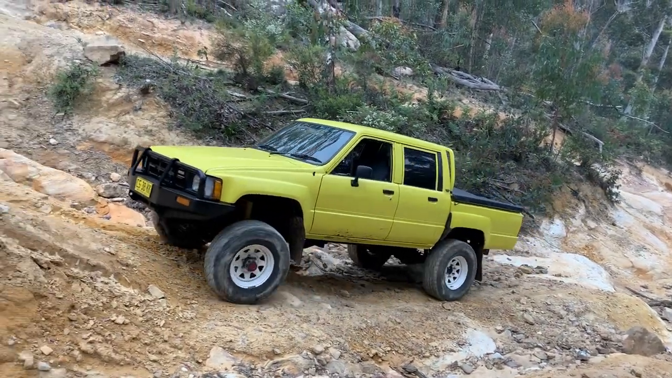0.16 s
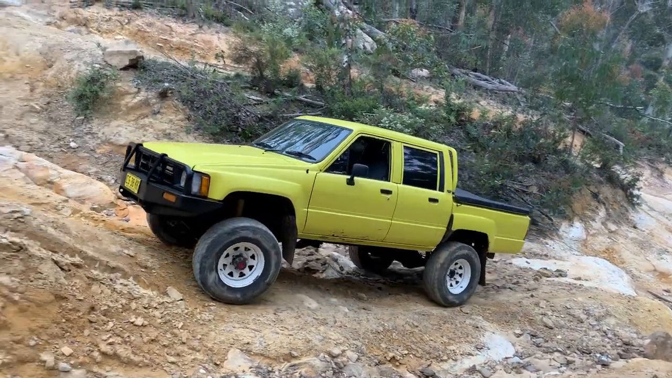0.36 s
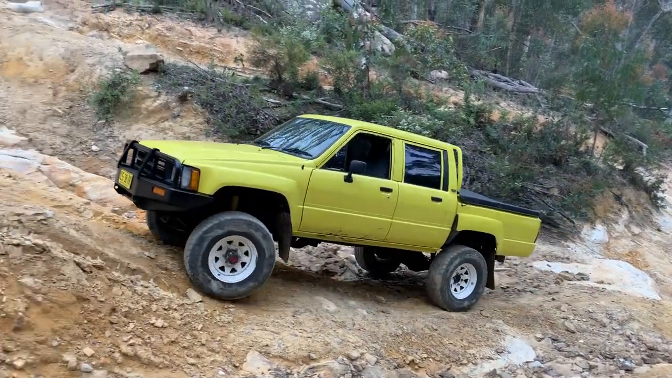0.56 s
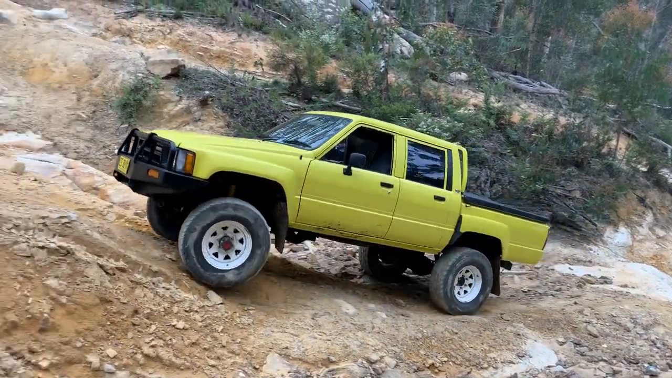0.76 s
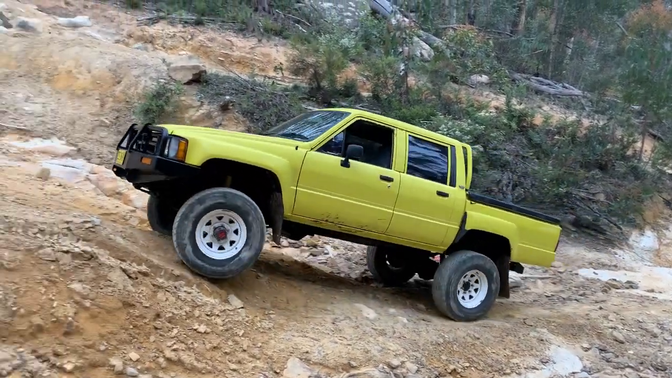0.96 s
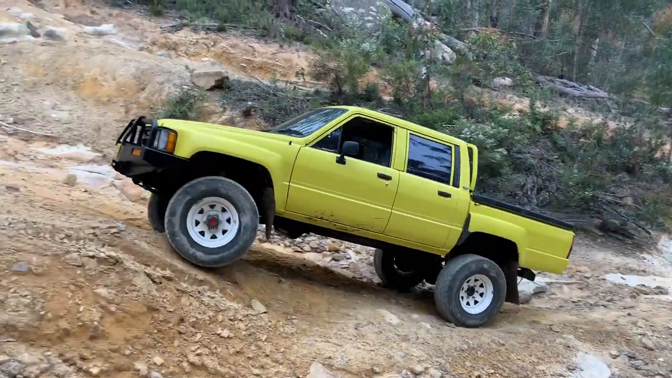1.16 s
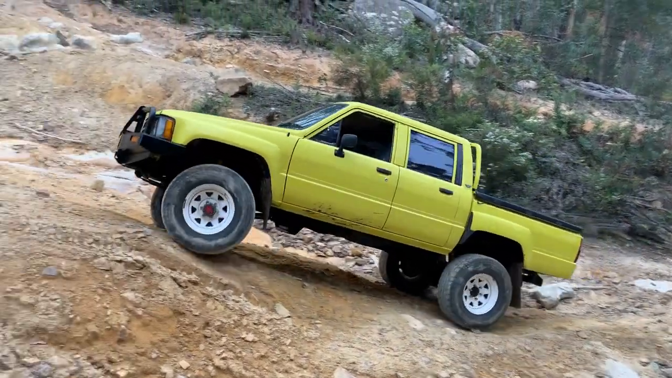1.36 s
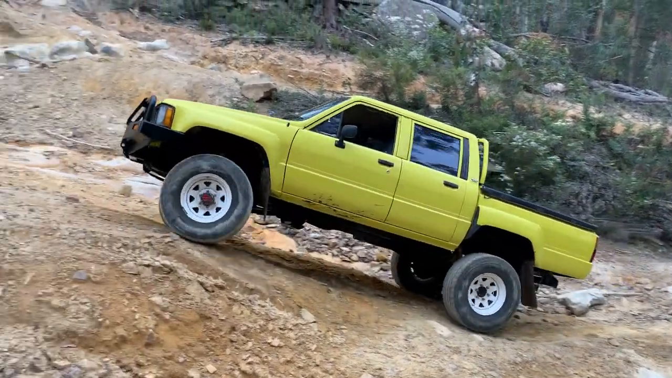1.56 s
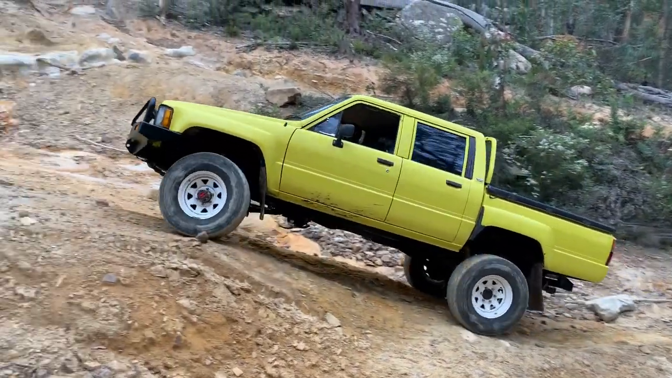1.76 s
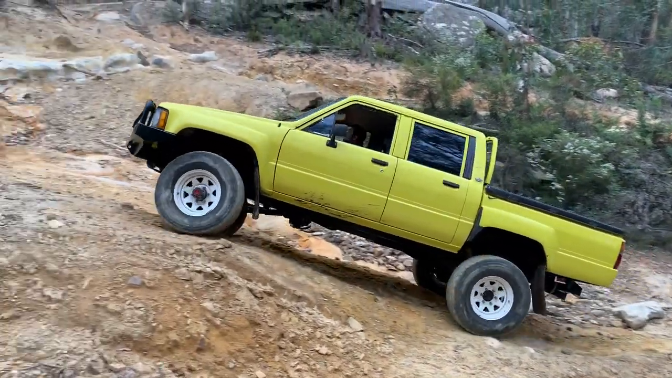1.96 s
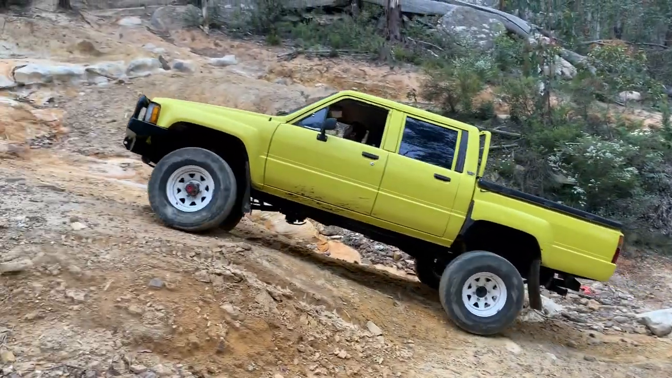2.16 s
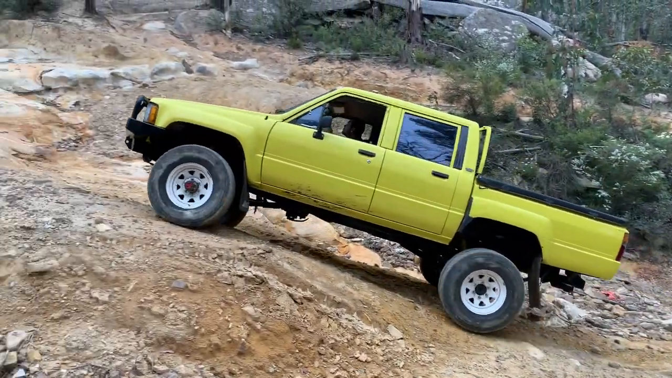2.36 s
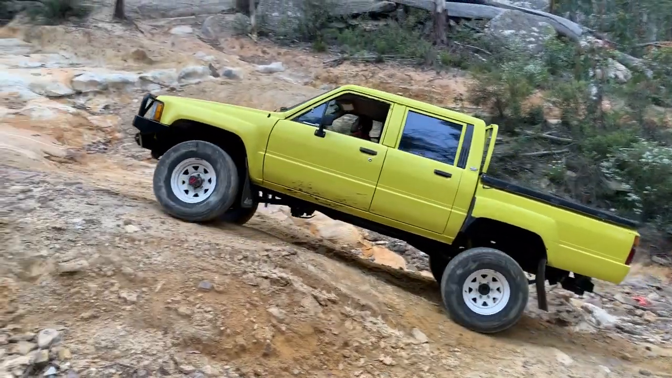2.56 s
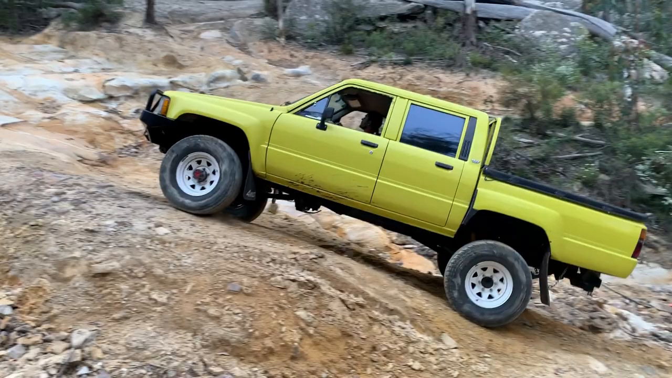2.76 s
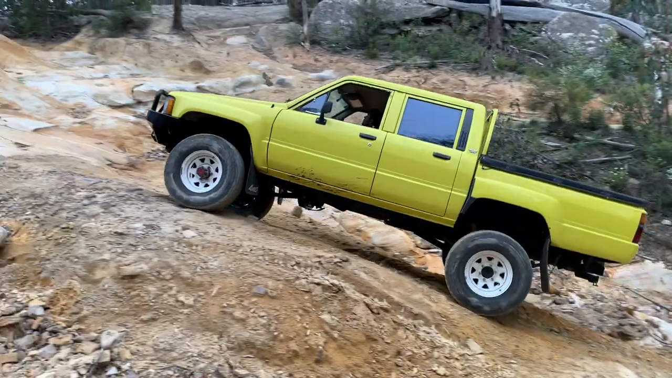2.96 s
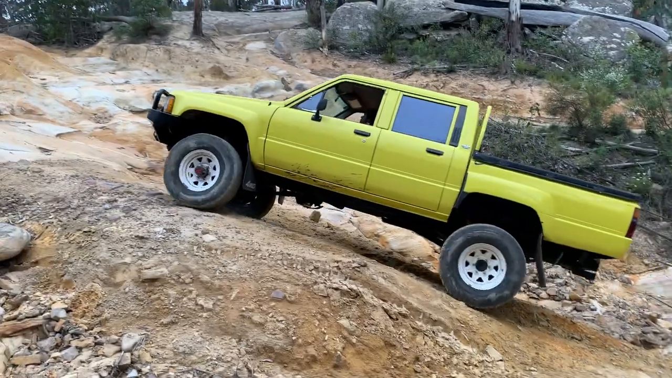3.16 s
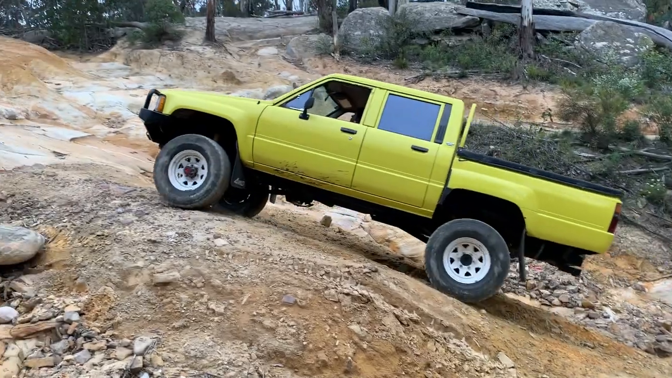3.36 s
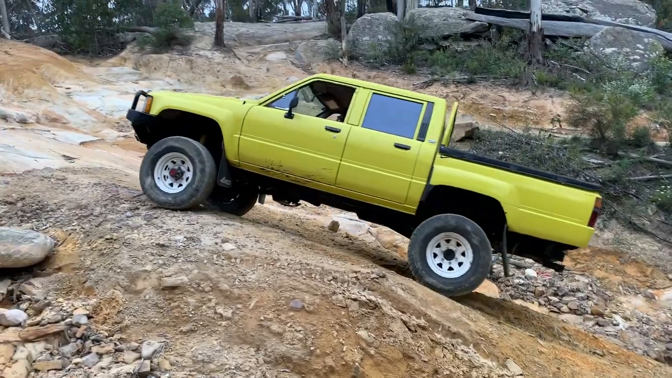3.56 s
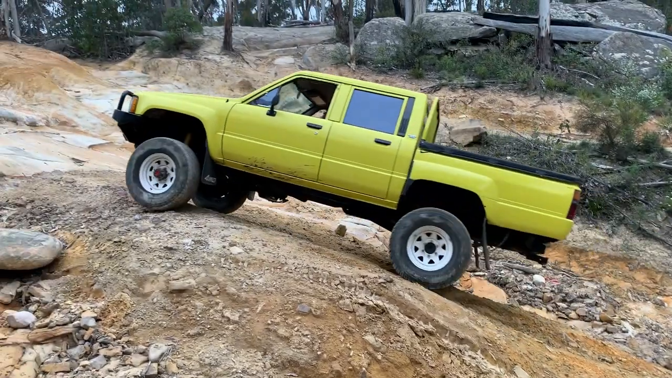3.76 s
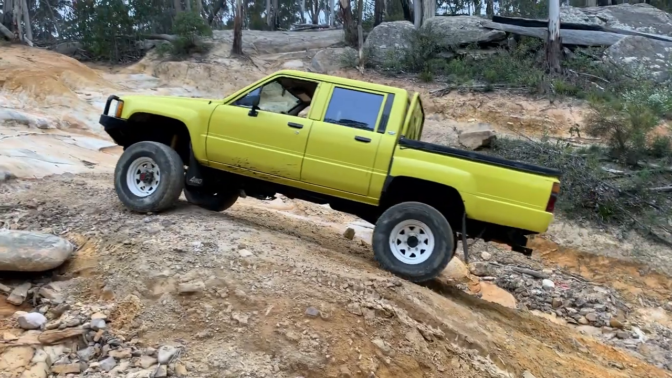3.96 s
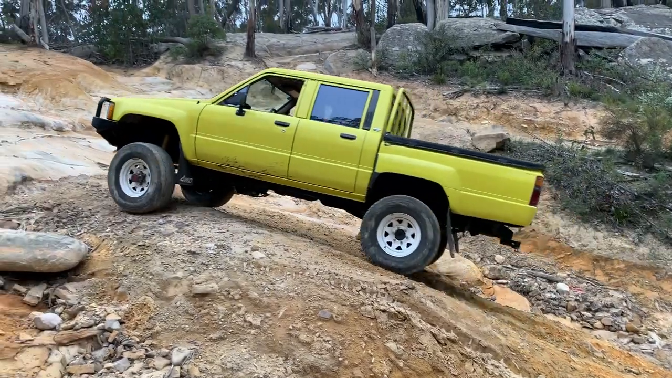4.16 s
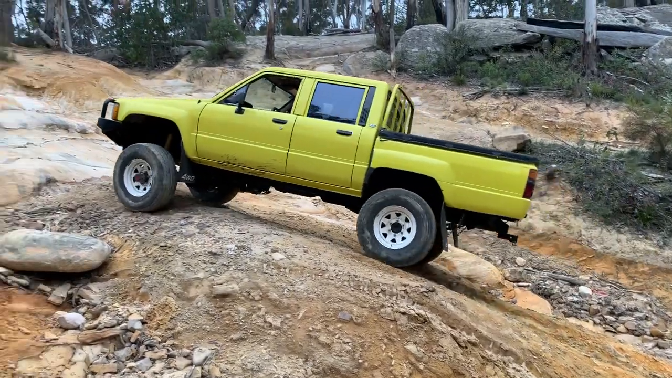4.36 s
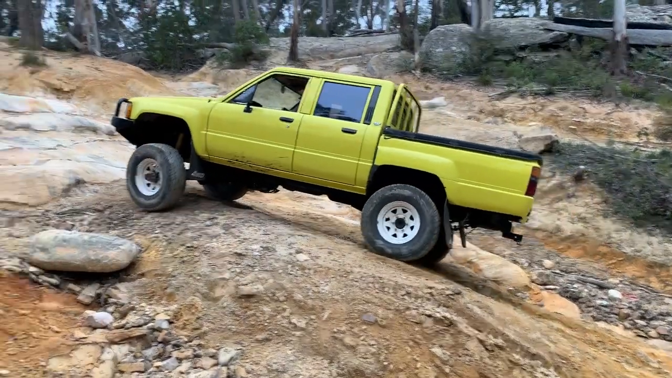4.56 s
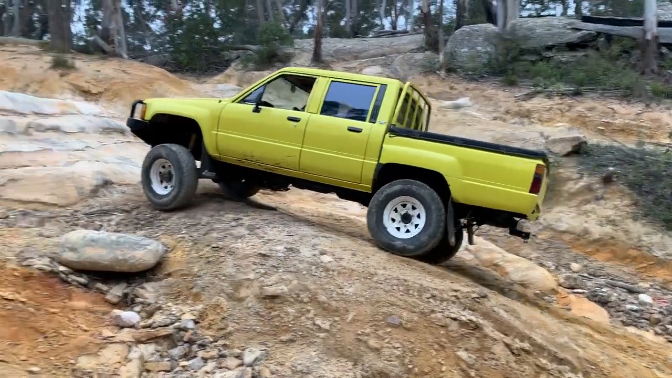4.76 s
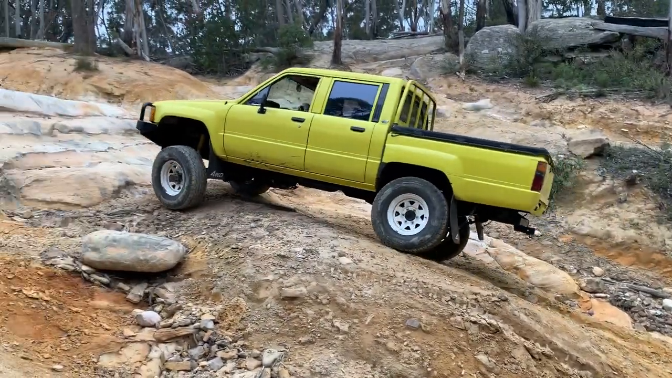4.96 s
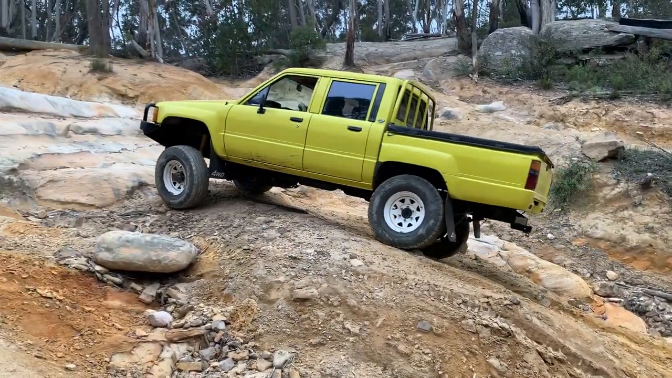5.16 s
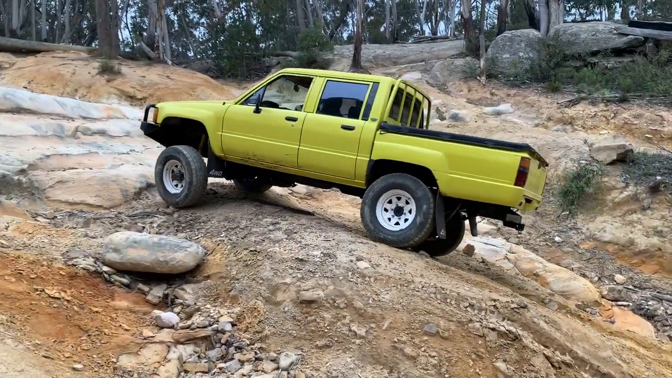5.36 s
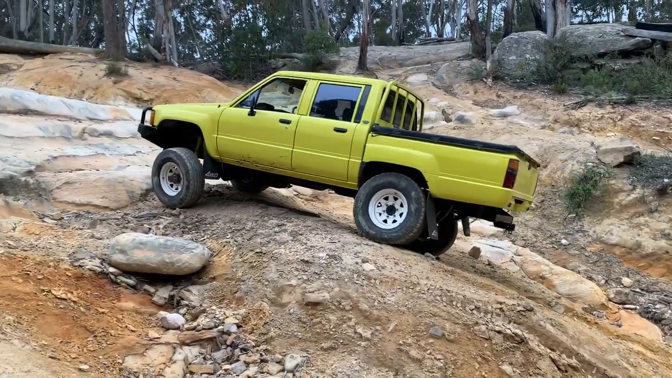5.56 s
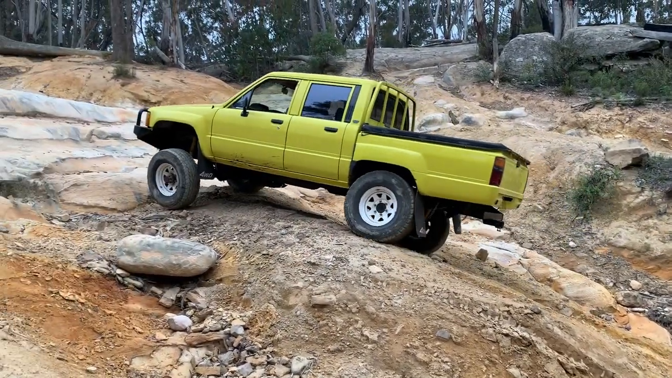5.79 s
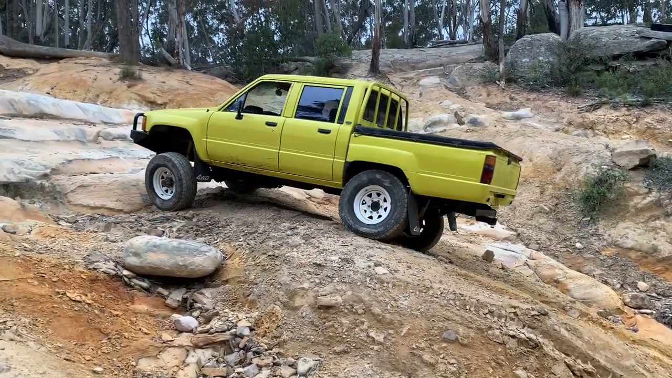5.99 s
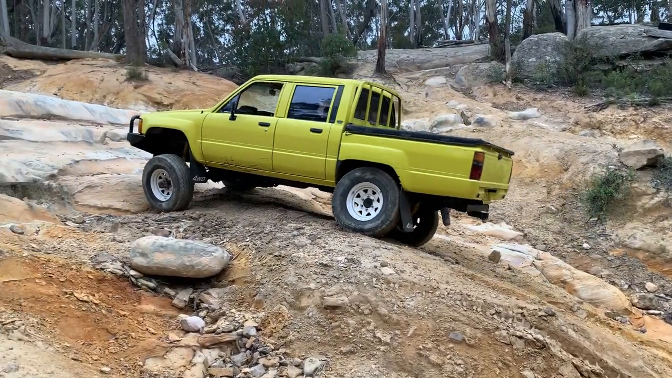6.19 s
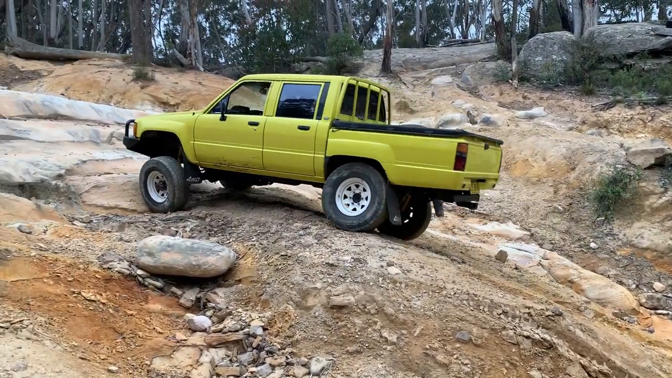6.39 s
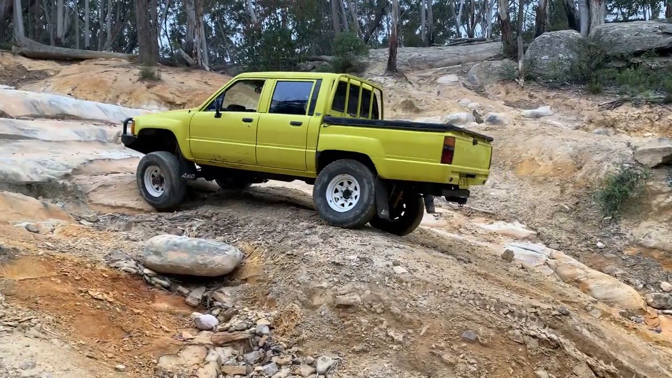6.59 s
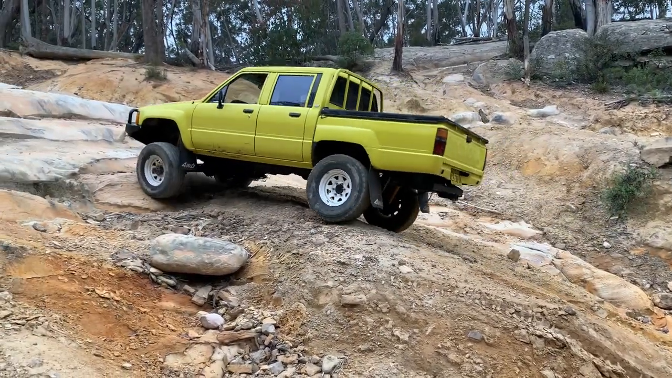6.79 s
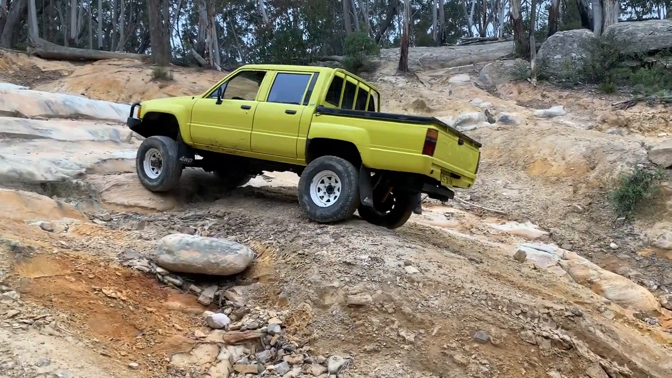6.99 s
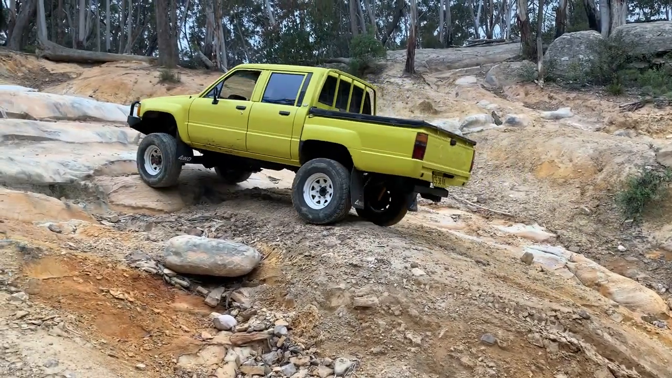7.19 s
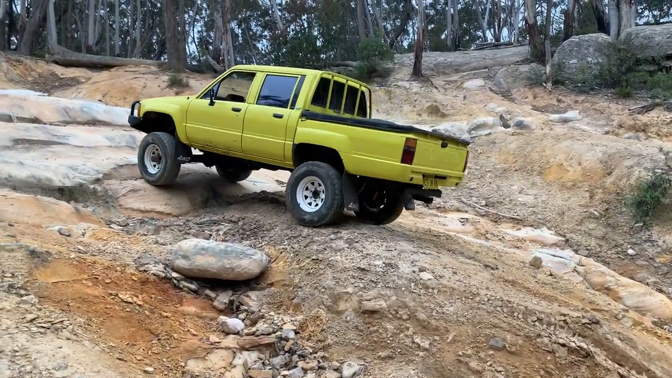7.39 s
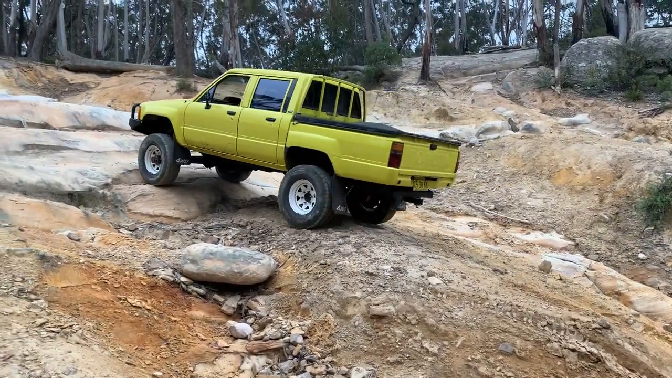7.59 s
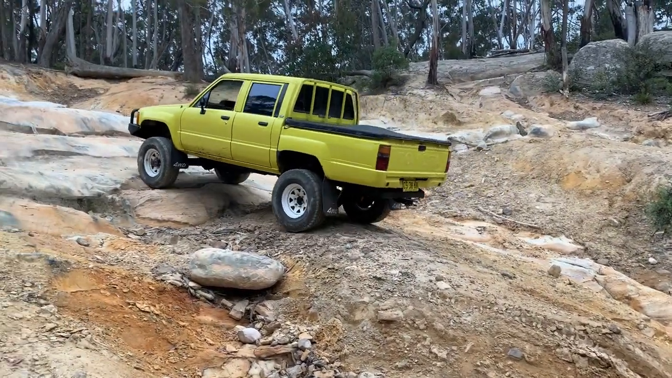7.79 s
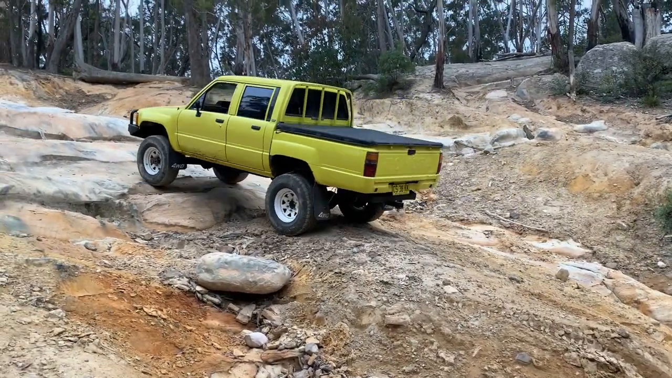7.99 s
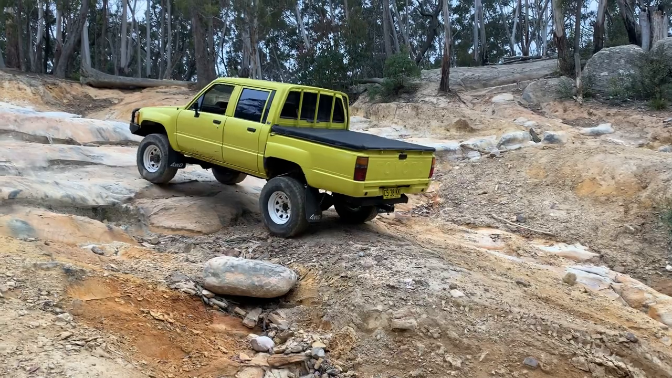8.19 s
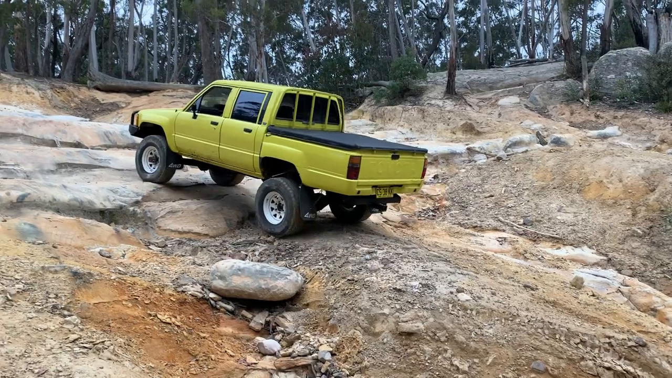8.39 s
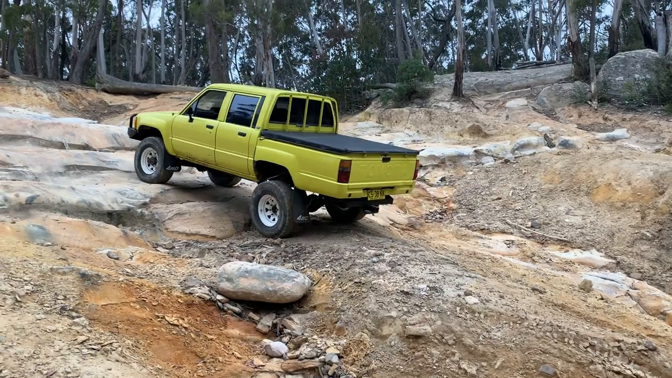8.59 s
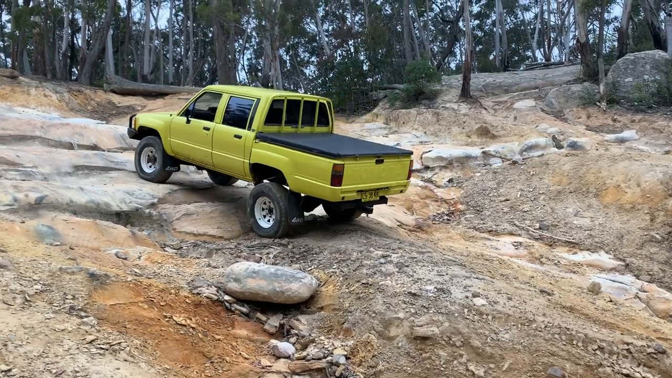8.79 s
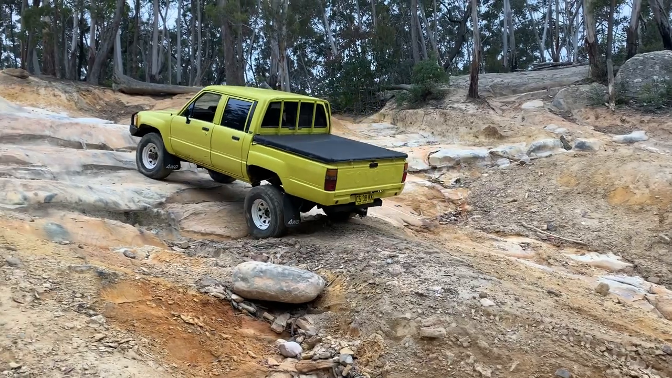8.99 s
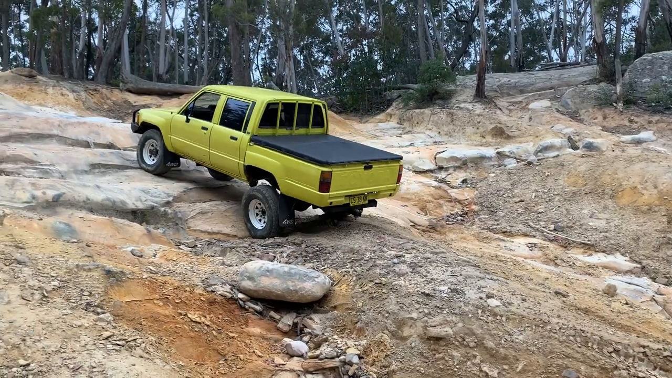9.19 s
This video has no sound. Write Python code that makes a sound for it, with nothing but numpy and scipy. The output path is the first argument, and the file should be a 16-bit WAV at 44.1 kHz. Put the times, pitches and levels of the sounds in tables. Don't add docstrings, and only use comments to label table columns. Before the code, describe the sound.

A close handheld stereo phone hears an old four-cylinder diesel climbing bare rock. First comes a fast, full exhaust roar with metallic knocking, short gritty tyre scrapes and stone cracks. The engine backs off over the crest into a hollow panel drone and slow separate thuds, bangs hard once, then picks up moderately, softer and turned away, with a thin high metal chirp and small knocks.

```python
import sys
import numpy as np
from scipy import signal
from scipy.fft import rfft, irfft
from scipy.io import wavfile
from scipy.ndimage import uniform_filter1d

SR = 44100
rng = np.random.default_rng(int(sys.argv[2]) if len(sys.argv) > 2 else 0)


def elevation(decibels):
    levels = np.asarray(decibels, float)
    return 10 ** (levels / 20)


def generate_wav(sig):
    pcm = np.round(np.clip(np.atleast_2d(sig).T, -1, 1) * 32767).astype(np.int16)
    wavfile.write(sys.argv[1], SR, pcm)


N = 407484
TIME, FREQ = np.arange(N) / SR, np.fft.rfftfreq(N, 1 / SR)

# (time [s], firing rate [Hz], exhaust level [dB], load [dB], engine bay nearness [dB])
DRIVE = [(.3, 47.88, 1.5, 0.4, 0.5), (1.3, 48.7, 4.5, 1, 1), (1.96, 55.44, 3.5, 5, 1),
         (2.24, 52.1, 4.5, 3.5, 1), (2.5, 56.93, 3, 5, 0.5), (2.85, 51.6, 4.5, 2, 0),
         (3.17, 54.56, 4, 3.5, 1), (3.65, 52.05, 3, 2, -3.5), (4.2, 44.4, 0, -4, -6.5),
         (4.74, 39.3, -5, -4, -6.5), (5.13, 28.54, -2.5, -2.3, -7), (6.1, 33.33, -4.5, -3, -0.5),
         (6.48, 30.65, -6, -2, -2.5), (6.92, 37.7, -4.5, -3, 0), (7.55, 36.05, -3.5, -2.5, 0),
         (7.97, 40.03, -6, -0.8, -1), (8.6, 36.41, -3.5, -3.5, -2.5), (9.0, 37.85, -3.5, -5, -4.5)]
TURN_FROM_S, TURN_TO_S = 3.7, 6.7
COAST_FROM_S, COAST_TO_S, COAST_EDGE_S = 3.86, 5.42, 0.35
# (own level [dB], share of exhaust level [dB/dB],
# share of nearness [dB/dB], change once turned away [dB], change coasting [dB])
LAYERS = [
    (-31.5, 0.61, .3, 0.5, -1.2),
    (-37.5, .01, .95, -1.5, 2.8),
    (-44, .01, 0.75, -1.5, 2.5),
    (-35.5, 0.61, 0.98, 5, -4.5),
    (-36.5, 0.28, .01, -8.5, 1),
]
CYLINDERS_DB = [0.5, -0.048, 0.39, -0.15]
# (own level [dB], answer to load [dB/dB])
ORDERS = [(-0.7, 0.72), (3, 2.2), (5, 0.59), (-2, -2.32)]
# (centre [Hz], width [Hz], level [dB])
SILENCER = [(50.5, 32.5, -20), (74.2, 12.3, -21), (92.7, 4.5, -32.5), (165.2, 9.7, -34),
            (187.3, 63.3, -31.5)]
# (centre [Hz], width [Hz], level [dB])
PIPE_MODES = [(184, 25.4, -4), (233, 21.8, 7.5), (305.6, 42, 0), (383, 20, -4.5), (415.5, 40, -1.5),
              (529, 19, -5.5)]
# (frequency [Hz], density [dB])
RASP_COLOUR = [(34, -34), (52, 2), (130, -8.5), (180, -1.5), (240, -10.5), (340, -13.5), (420, -13),
               (900, -46)]
# (frequency [Hz], density [dB])
DRUM_COLOUR = [(250, -26), (370, -6.5), (440, -2.5), (490, -3), (560, 1), (600, -7.5), (670, -17.5),
               (1200, -35)]
# (frequency [Hz], density [dB])
KNOCK_COLOUR = [(400, -50), (650, -7.5), (1000, -1.5), (1500, -2), (1860, 1.5), (2010, -5.5), (2600, -4),
                (3100, -13), (5000, -29.5)]
# (frequency [Hz], density [dB])
TICK_COLOUR = [(1800, -40), (3200, 1), (5000, 2.5), (7200, 0.5), (8200, 5), (10500, 1.5), (13000, -10),
               (15200, -9), (17000, -28)]
# (centre [Hz], width [Hz], level [dB])
CASTING_MODES = [(784, 34, -12.5), (1055, 23, -20.5), (1363, 40, -19.5), (1528, 47, -12), (1853, 37, -9),
                 (2086, 70, -12), (2470, 20, -14.5), (2606, 18, -25), (3670, 50, -26.5), (6440, 150, -21),
                 (8230, 140, -14), (9170, 220, -18), (13200, 1100, -14)]
# (middle [s], length [s], peak level [dB], centre [Hz], width [octaves])
SCRAPES = [(.95, 0.067, -29, 756, 1.8), (.951, 0.11, -26.5, 294, 0.81), (1.063, .05, -34.5, 1740, 0.69),
           (1.935, .12, -28, 730, 3.4), (2.136, 0.088, -31.5, 1360, 2.1), (3.366, 0.15, -34.5, 1150, 2.3),
           (3.621, 0.072, -36, 1394, 2.58), (4.975, 0.18, -44, 1700, 1.7), (5.661, 0.046, -31.5, 1420, 2.1),
           (5.742, 0.14, -26, 255, 0.76), (5.76, 0.19, -33, 481, 0.28), (4.974, 0.088, -27.5, 128.2, 0.67),
           (6.143, 0.065, -30, 220, 0.74), (6.697, 0.3, -35.5, 278.8, 1.2), (7.072, 0.084, -40.5, 5250, 1),
           (7.082, 0.051, -31, 785, 2.5), (7.272, 0.11, -41, 2400, 3.1), (8.859, 0.13, -37, 198, 0.61),
           (8.865, 0.09, -40, 1054, 1.76)]
# (time [s], peak level [dB], ring [Hz], t60 [s])
KNOCKS = [(.876, -17, 694, 0.042), (1.852, -19, 1310, .028), (1.932, -18, 1096, 0.045),
          (1.952, -24, 1290, .04), (2.107, -26, 1480, .029), (2.135, -25, 1420, .04),
          (5.095, -35, 1849, 0.034), (5.299, -33, 1720, 0.017), (5.616, -19.5, 459.5, .038),
          (5.627, -23, 460, 0.058), (5.648, -14, 417, 0.13), (5.653, -10, 499, 0.14),
          (5.668, -10.5, 422, .054), (6.014, -26, 1095, 0.027), (6.115, -26, 1141, .04),
          (6.398, -21.5, 1096, .029), (7.074, -21, 780, .05), (7.46, -28, 893, 0.037),
          (7.75, -36, 1868, 0.049), (8.118, -28, 1013, 0.03), (8.569, -30, 2208, 0.027),
          (8.573, -17, 5590, 0.0045), (8.575, -21, 900, 0.05), (8.58, -18, 720, 0.024),
          (8.59, -21, 906, 0.029), (8.799, -33, 1902, 0.06), (8.996, -29, 8240, 0.013),
          (9.005, -29, 6600, 0.011)]
# (time [s], level [dB])
WHINE = [
    (1.3, -85),
    (1.8, -62),
    (3.3, -66),
    (3.9, -85),
]
# (start [s], end [s], first pitch [Hz], last pitch [Hz], peak level [dB])
SHIELD_SPELLS = [
    (5.7, 6.4, 4720, 4700, -43),
    (6.7, 7.9, 4180, 4390, -33.5),
]
SHIELD_RISE_S = 0.22
# (frequency [Hz], phase [rad])
PORT_LEAD = [(1550, .05), (2500, 7.9), (3010, 8.0), (4050, 14.7), (6890, 20.9), (8440, 19.4), (11300, 15.8),
             (15200, 10.2)]
# (frequency [Hz], level [dB])
PORT_BALANCE = [(110, -1.6), (200, -.7), (380, -.5), (700, 1.0), (1290, 4), (2380, 3.6), (4400, .5),
                (8120, -.4)]
# (frequency [Hz], level [dB])
ROCK_SCATTER = [(60, -4), (300, -27), (640, -2), (1400, -8.5), (2800, 6), (5000, 3.5), (9000, 25.5),
                (14000, -47)]


def curve(table):
    s, *columns = np.transpose(table)
    return [np.interp(TIME, s, c) for c in columns]


def shape(table):
    hz, value = np.transpose(table)
    return np.interp(np.log(FREQ + 1), np.log(hz + 1), value)


def unit(x):
    return x / np.sqrt(np.mean(x ** 2))


def ring(x, hz, width_hz):
    return signal.lfilter(*signal.iirpeak(hz, hz / width_hz, fs=SR), x)


def spell(start, end, edge_s):
    return np.clip(np.minimum(TIME - start, end - TIME) / edge_s + 1, 0, 1)


def per_firing(turns, scatter_db, pattern=0.12):
    k = turns.astype(int)
    chance = rng.standard_normal(N // 500)
    habit = np.array(CYLINDERS_DB)[k % len(CYLINDERS_DB)]
    return elevation(pattern * habit + scatter_db * chance[k])


def firing_pulses(turns):
    return np.diff(np.floor(turns), prepend=0)


def puff(turns, late, decay, steady):
    phase = (turns - late) % 1
    return steady + (1 - np.exp(-phase / 0.11)) * np.exp(-phase / decay)


def ports():
    side = np.array([[.5], [-.5]])
    lead = shape(PORT_LEAD) - np.minimum(FREQ, 300) * 8e-4
    return elevation(side * shape(PORT_BALANCE)), np.exp(1j * side * lead)


def hiss(colour):
    direct, *scatter = rng.standard_normal((3, len(FREQ), 2)) @ np.array([1, 1j])
    shade, lead = ports()
    wet = elevation(shape(ROCK_SCATTER))
    field = (direct * lead + wet * np.array(scatter)) / np.sqrt(1 + wet ** 2)
    return unit(irfft(elevation(shape(colour)) * shade * field, N))


def order_levels(hz, level_db, load_db):
    out = []
    for k, (own_db, per_load) in enumerate(ORDERS):
        pitch = (k + 1) * hz
        passed = sum(elevation(db) ** 2 / (1 + (2 * (pitch - f) / w) ** 2) ** 2 for f, w, db in SILENCER)
        null_db = -8.5 * np.exp(-((pitch - 42.6) / 2.9) ** 2)
        out.append(10 * np.log10(passed) + null_db + own_db + level_db + per_load * load_db)
    return out


def exhaust(turns, hz, lug, orders_db, ring_db):
    gains = uniform_filter1d(elevation(np.array(orders_db)), size=4500)
    lags = [.027 * (hz - 48), .25, .09 + .7 * lug, .25 + .7 * lug]
    boom = 0
    for k, gain in enumerate(gains):
        uneven = uniform_filter1d(per_firing(turns + .5, .8 + .9 * lug, .9 + .9 * lug), size=500)
        boom = boom + np.sqrt(2) * gain * uneven * np.cos(2 * np.pi * ((k + 1) * turns - lags[k]))
    pulses = firing_pulses(turns) * per_firing(turns, 0.85 + 1.2 * lug, 0.97)
    pipe = 0
    for k, (f, w, db) in enumerate(PIPE_MODES):
        lean_db = 57 * lug * np.clip(np.log2(f / 215), -.4, .7)
        pipe = pipe + (-1) ** k * elevation(db - lean_db) * ring(ring(pulses, f, w), f, 2 * w)
    return boom + elevation(ring_db) * unit(pipe)


def engine_bay(turns, lug, rasp_db, knock_db, tick_db, drum_db):
    shared = uniform_filter1d(per_firing(turns - .15, 0.99), size=150)
    rasp_uneven = uniform_filter1d(per_firing(turns - .1, 2.5), size=200)
    rasp = hiss(RASP_COLOUR) * unit(puff(turns, 0.083, 1.0, 1.0) * rasp_uneven)
    drum_uneven = uniform_filter1d(per_firing(turns - .1, 1.5), size=200)
    drum = hiss(DRUM_COLOUR) * unit(puff(turns, 0.057, 1.0, 6.4) * drum_uneven)
    knock = hiss(KNOCK_COLOUR) * unit(puff(turns, .15, .45, .95 - .6 * lug) * shared)
    tick = hiss(TICK_COLOUR) * unit(puff(turns, .15, .36, .75 - .52 * lug) * shared)
    wander = np.repeat(rng.standard_normal(N // 2500 + 1), 2500)[:N]
    tick = tick * elevation(0.63 * uniform_filter1d(wander, size=2500))
    return elevation(rasp_db) * rasp + elevation(drum_db) * drum + elevation(knock_db) * knock + elevation(tick_db) * tick


def casting(turns, knock_db, clatter_db):
    burst = unit(rng.standard_normal(N) * puff(turns, .15, .16, .08))
    modes = 0
    for hz, w, db in CASTING_MODES:
        heavy = hz < 4000
        struck = burst * per_firing(turns - .15, 3.0)
        modes = modes + elevation(db + clatter_db * heavy) * unit(ring(struck, hz, w))
    return elevation(knock_db - 5.5 + np.array([[1.2], [-1.2]])) * modes


def scrapes():
    out = np.zeros((2, N))
    air = hiss([(20, 0), (20000, 0)])
    grains_db = 2.5 * rng.exponential(size=N // 90 + 1)
    air = air * np.repeat(elevation(grains_db), 90)[:N]
    for s, length, db, hz, octaves in SCRAPES:
        near = slice(int((s - 2 * length) * SR), int((s + 2 * length) * SR))
        edges = hz * 2 ** (np.array([-.5, .5]) * octaves)
        band = signal.butter(1, np.minimum(edges, SR / 2.2), "band", fs=SR, output="sos")
        grit = unit(signal.sosfilt(band, signal.sosfilt(band, air[:, near])))
        out[:, near] += elevation(db) * grit * np.exp(-(2 * (TIME[near] - s) / length) ** 2)
    return out


def knocks():
    out, t = np.zeros(N), TIME[:8000]
    for s, db, hz, t60 in KNOCKS:
        grit = rng.standard_normal(len(t))
        modes = sum(np.sin(2 * np.pi * hz * ratio * t) for ratio in (.8, .93, 1.06, 1.22)) / 3.6
        crack = uniform_filter1d(grit, size=4) * np.exp(-t / 0.00067)
        i = int(s * SR)
        out[i:i + len(t)] += elevation(db) * (modes * elevation(-60 * t / max(t60, 1 / 300)) + 0.06 * crack)
    return out


def alternator(turns):
    return elevation(curve(WHINE)[0]) * np.sin(2 * np.pi * 128 * turns)


def overrun(turns):
    panel_hz, width_hz = 558.6, 49
    pulses = firing_pulses(turns) * per_firing(turns, 4.8)
    drone = ring(ring(pulses, panel_hz, width_hz), panel_hz, width_hz)
    return elevation(-39) * unit(drone) * spell(4.31, 4.54, COAST_EDGE_S)


def rattle():
    hz, gain = np.full(N, 1. * SHIELD_SPELLS[0][2]), np.zeros(N)
    for start, end, first_hz, last_hz, db in SHIELD_SPELLS:
        creep = np.interp(TIME, [start, end], [first_hz, last_hz])
        hz = np.where(TIME > start - SHIELD_RISE_S, creep, hz)
        fade_db = -2.5 * (TIME - start)
        gain = gain + spell(start, end, SHIELD_RISE_S) * elevation(db + fade_db)
    return hz, gain


def shield(turns):
    hz, gain = rattle()
    wobble = 1 + .009 * rng.standard_normal(N // 500)[(turns - .08).astype(int)]
    tone = np.sin(2 * np.pi * np.cumsum(hz * wobble) / SR)
    return gain * tone * puff(turns, .08, .11, 0) * per_firing(turns - .08, 2.3, 1.5)


def scene():
    hz, level_db, load_db, near_db = curve(DRIVE)
    hz = uniform_filter1d(hz, size=int(.08 * SR))
    orders_db = order_levels(hz, level_db, load_db)
    away = np.interp(TIME, [TURN_FROM_S, TURN_TO_S], [0, 1])
    coast = spell(COAST_FROM_S, COAST_TO_S, COAST_EDGE_S)
    rasp_db, knock_db, tick_db, ring_db, drum_db = (
        db + a * level_db + b * near_db + away_db * away + coast_db * coast
        for db, a, b, away_db, coast_db in LAYERS)
    turns = 1 + np.cumsum(hz) / SR
    lug = np.clip((50 - hz) / 20, 0, 1)
    direct = exhaust(turns, hz, lug, orders_db, ring_db) + knocks() + overrun(turns)
    direct = irfft(rfft(direct) * np.prod(ports(), axis=0), N)
    engine = engine_bay(turns, lug, rasp_db, knock_db, tick_db, drum_db)
    engine = engine + casting(turns, knock_db, 1.5 * lug)
    return direct + engine + scrapes() + alternator(turns) + shield(turns)


def top_cut(x):
    return signal.sosfilt(signal.butter(12, 15710, fs=SR, output="sos"), x)


def record(dry):
    mid, side = rfft(np.array([dry[0] + dry[1], dry[0] - dry[1]]) / 2)
    deaf_hz, deaf_width_hz, top_hz = 11380, 720, 15340
    mid = mid * (np.abs(FREQ - deaf_hz) > deaf_width_hz / 2) * (FREQ < top_hz)
    dip_hz, dip_width_hz, dip_db = 9260, 740, -12
    side = side * elevation(dip_db * np.exp(-((FREQ - dip_hz) / dip_width_hz) ** 4))
    mix = irfft(np.array([mid + side, mid - side]), N)
    return top_cut(mix)


dry = scene()
out = record(dry)
generate_wav(out)
```